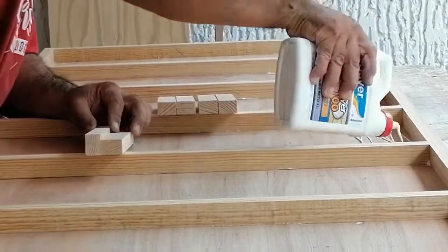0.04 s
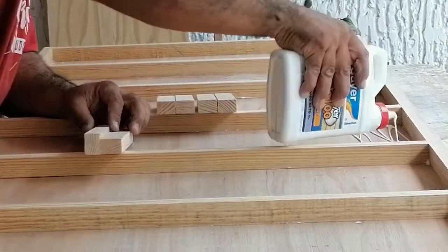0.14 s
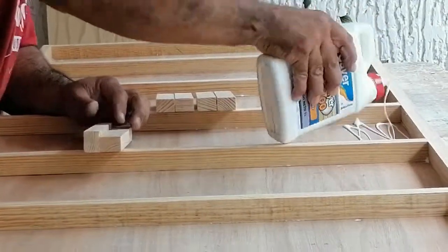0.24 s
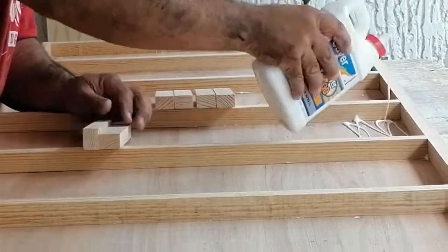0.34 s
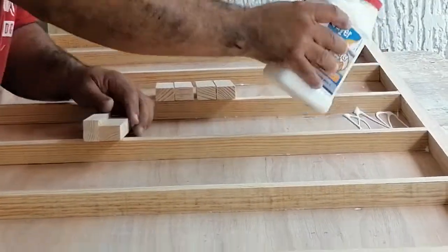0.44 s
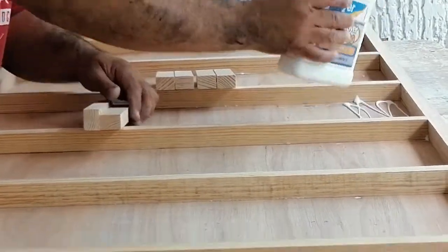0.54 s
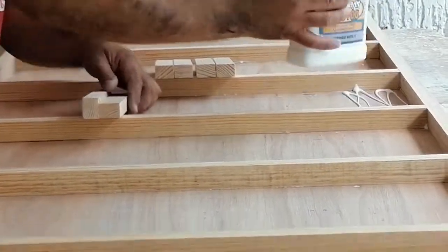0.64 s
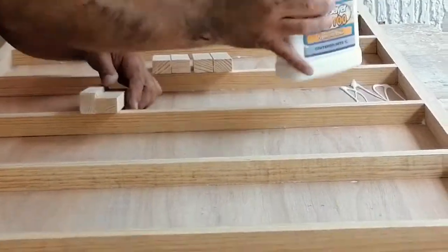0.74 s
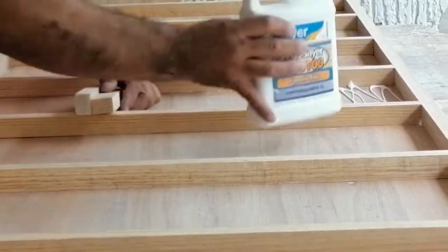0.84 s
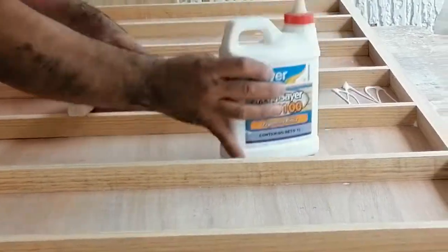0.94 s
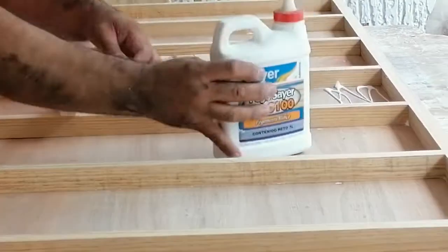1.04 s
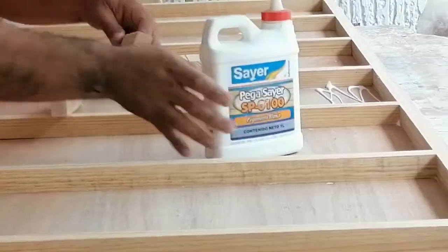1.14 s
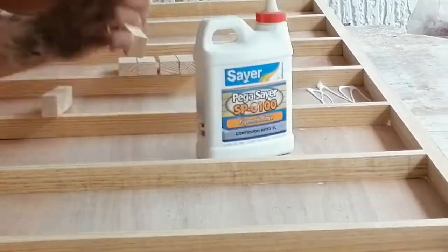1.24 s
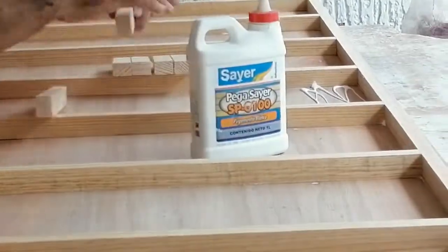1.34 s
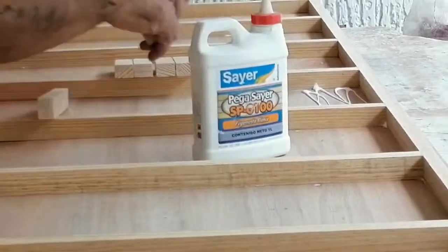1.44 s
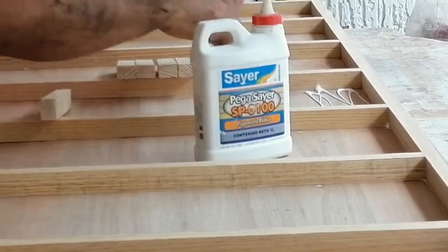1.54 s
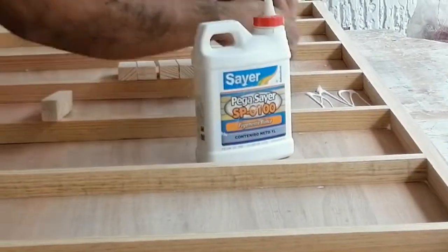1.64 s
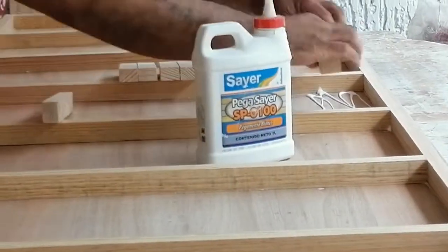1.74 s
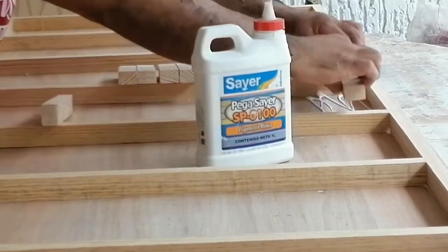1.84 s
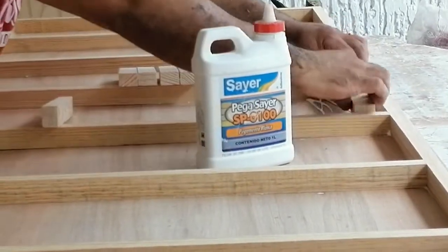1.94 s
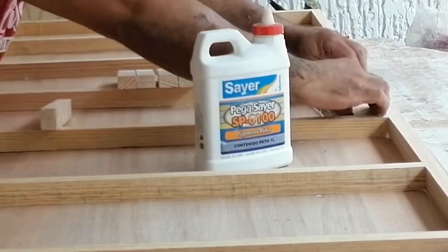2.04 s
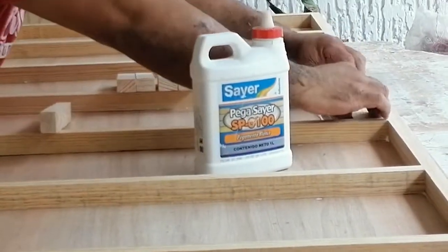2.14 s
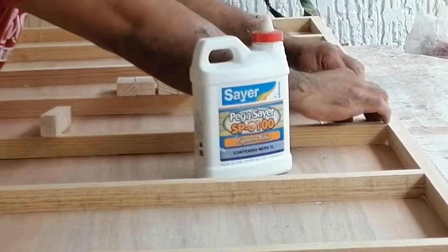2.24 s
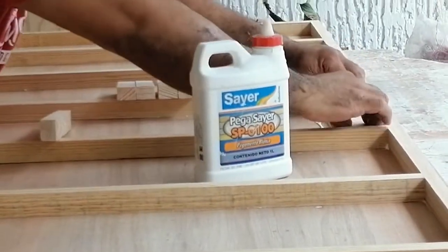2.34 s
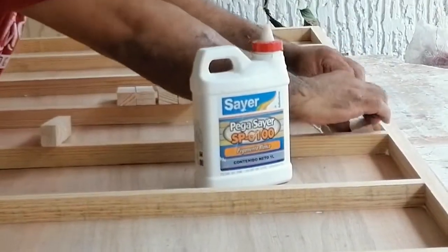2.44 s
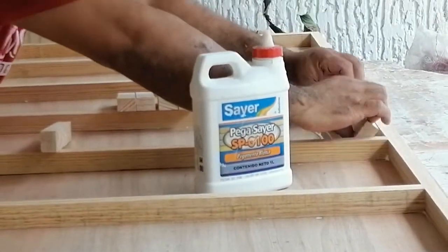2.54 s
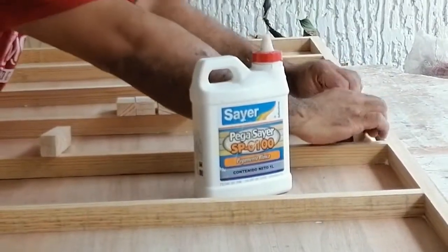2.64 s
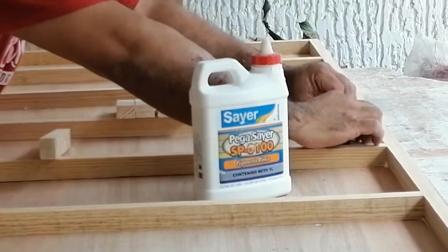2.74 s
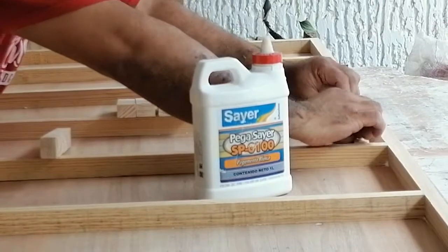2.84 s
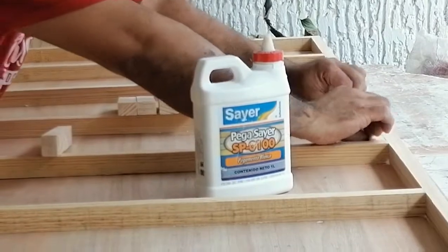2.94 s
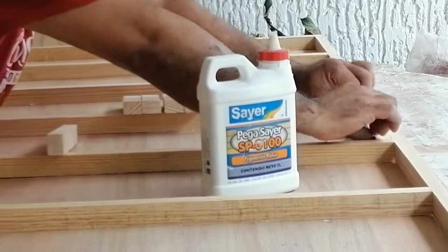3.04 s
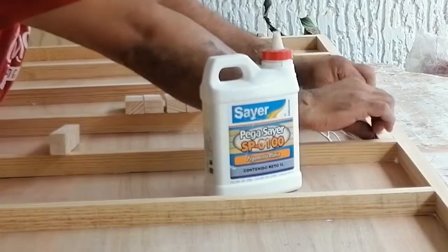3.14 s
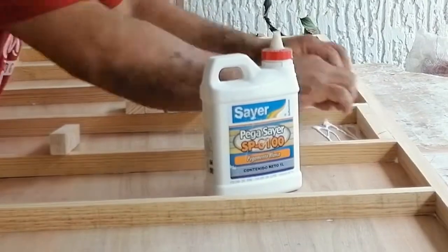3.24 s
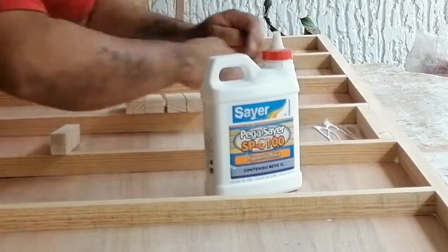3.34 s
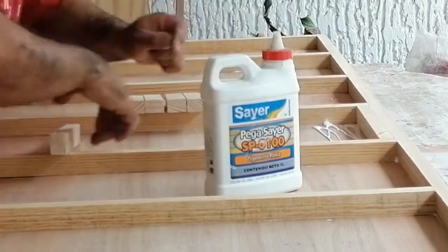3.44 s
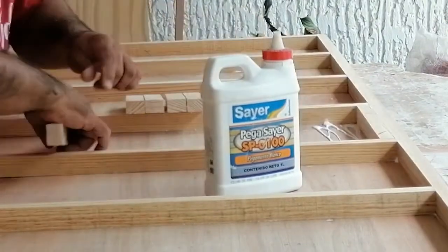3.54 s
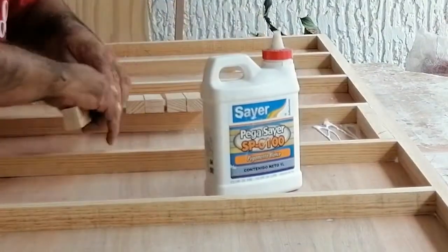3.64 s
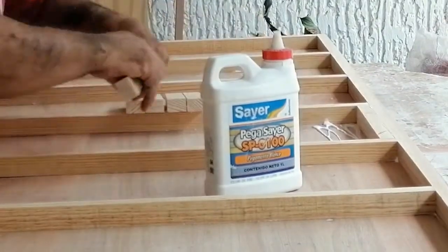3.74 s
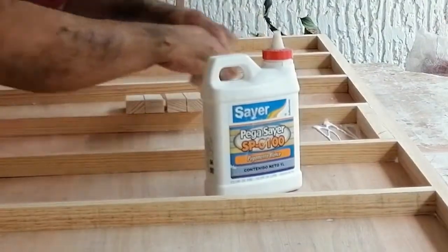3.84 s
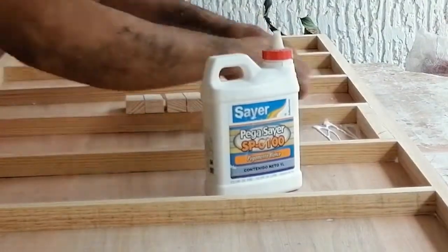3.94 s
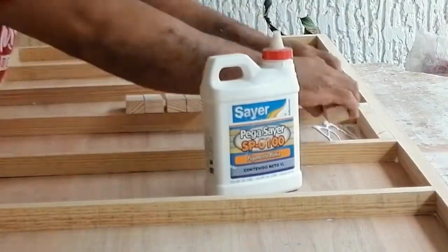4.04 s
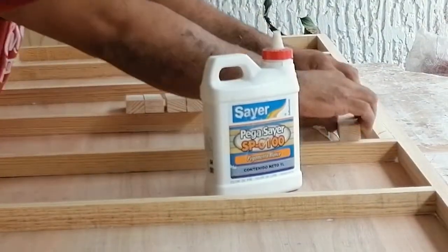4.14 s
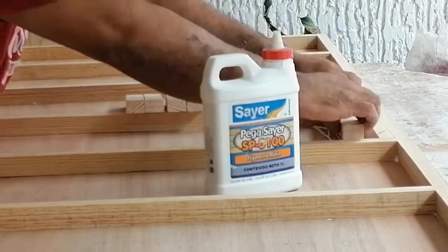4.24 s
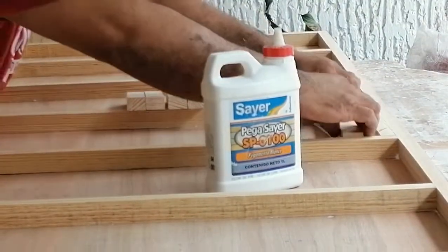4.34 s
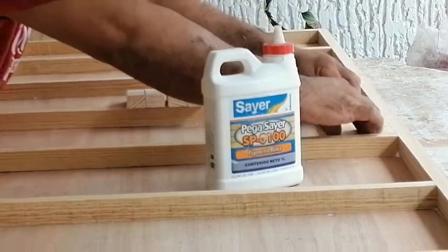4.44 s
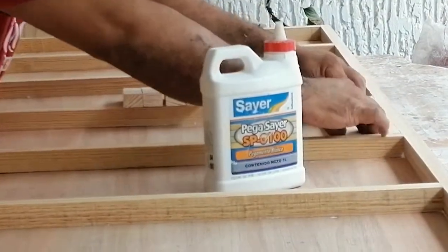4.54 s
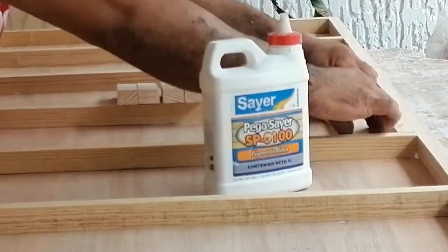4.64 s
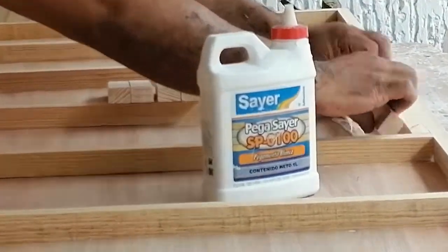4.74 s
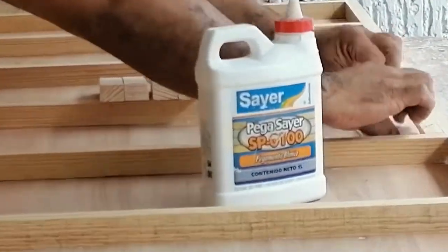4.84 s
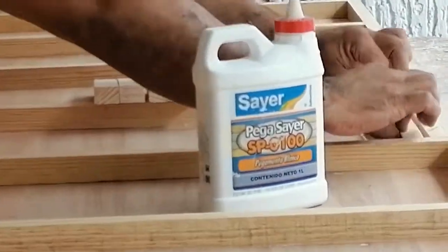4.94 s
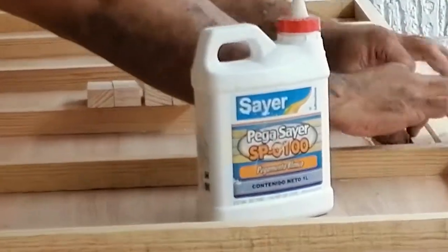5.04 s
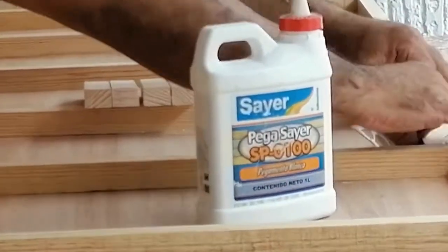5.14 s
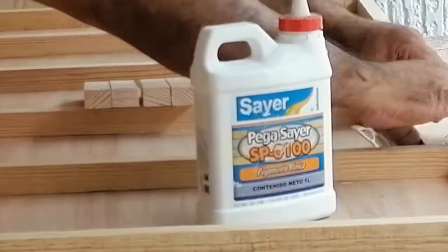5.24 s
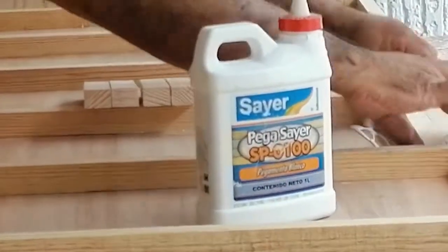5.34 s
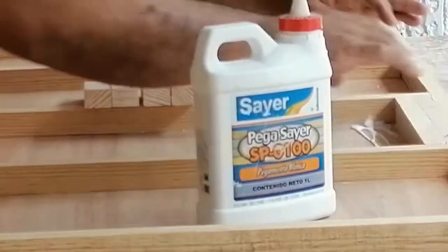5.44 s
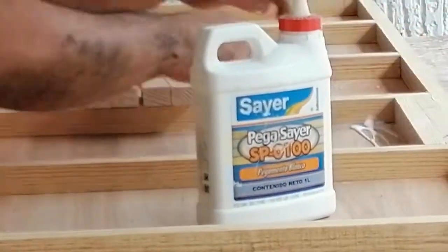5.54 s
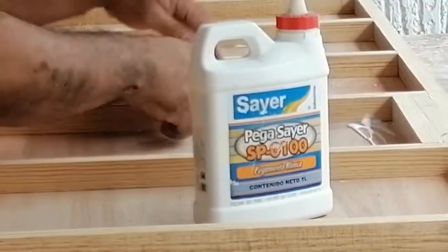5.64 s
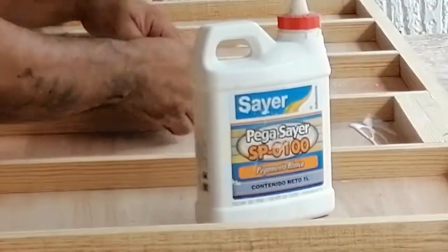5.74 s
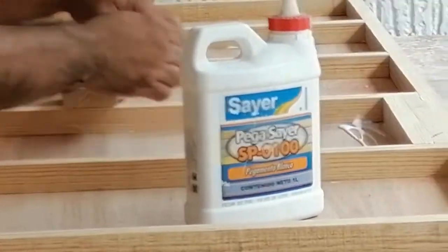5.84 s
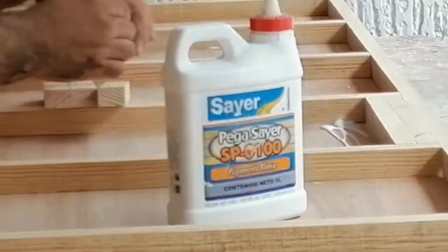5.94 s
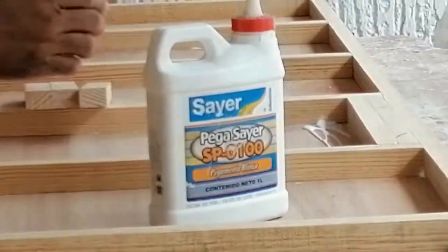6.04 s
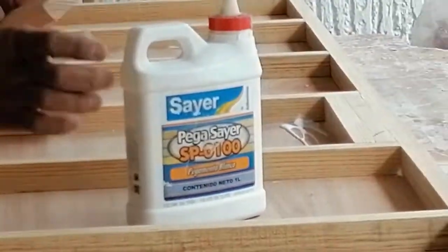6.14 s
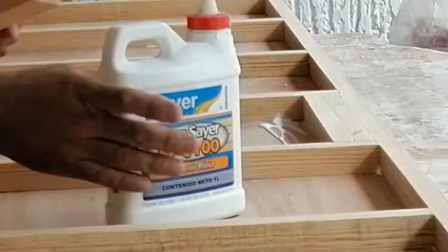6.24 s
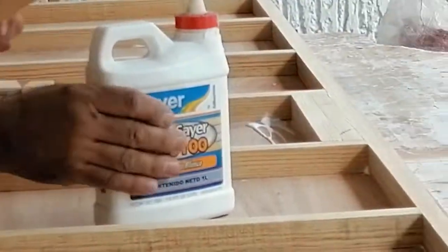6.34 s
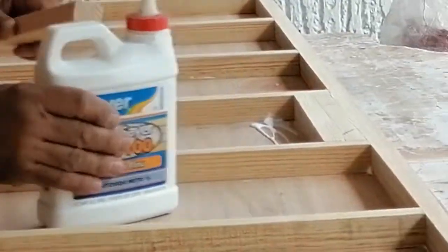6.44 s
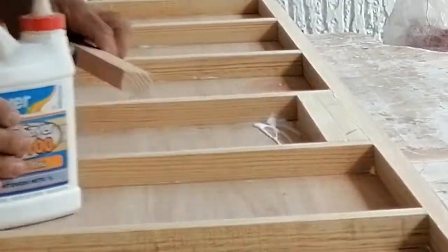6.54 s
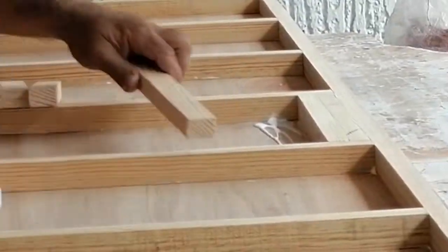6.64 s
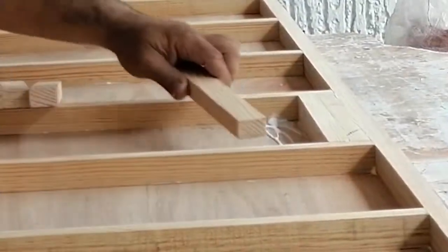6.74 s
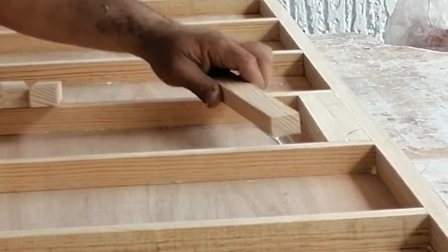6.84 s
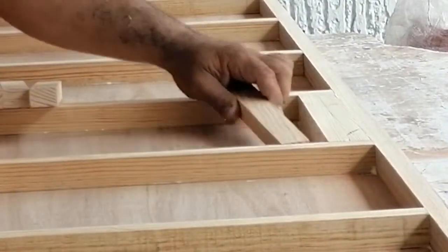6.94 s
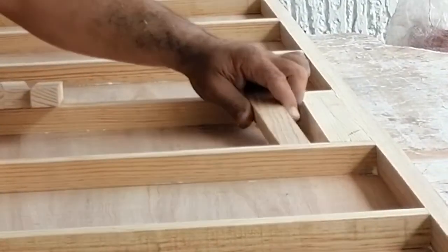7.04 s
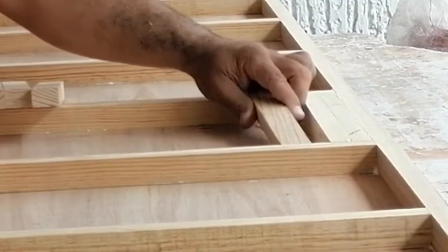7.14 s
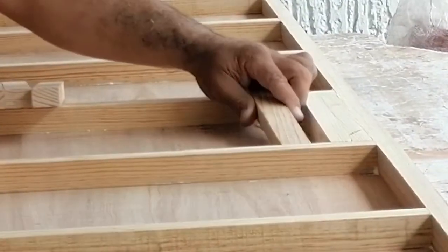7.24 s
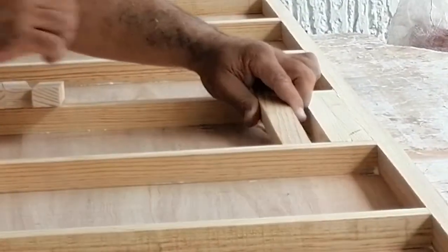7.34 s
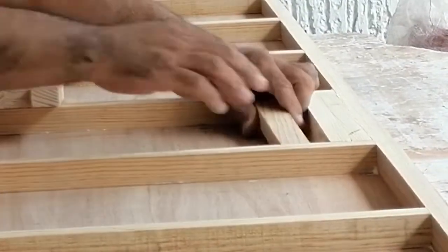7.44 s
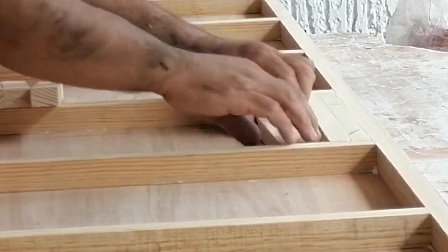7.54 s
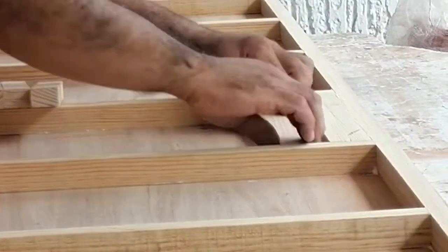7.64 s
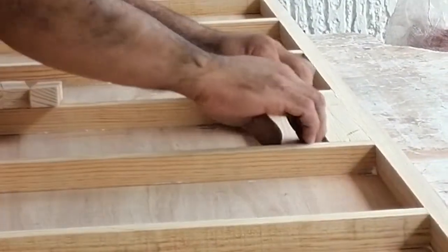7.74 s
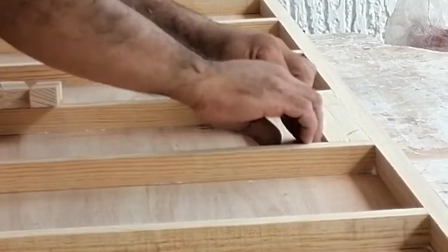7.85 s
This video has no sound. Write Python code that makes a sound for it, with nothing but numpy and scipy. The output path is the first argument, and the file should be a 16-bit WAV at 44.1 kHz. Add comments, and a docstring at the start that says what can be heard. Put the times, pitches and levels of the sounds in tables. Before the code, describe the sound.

Small wooden blocks and a plastic glue bottle knock and slide on a plywood frame in a slightly echoing workshop.

```python
"""Hard-walled workshop: wooden blocks and a plastic glue bottle are set down and shifted on a frame
of plywood and strips. Each touches with an edge and rings, then falls flat and drums the panel.
Sliding wood and bottle hiss and rasp; corners click, wood rings briefly, faint high whistles glide.
Two spaced microphones hear it all with the room's echo, over a low outdoor rumble and drone."""
import sys
import numpy as np
from scipy import signal
from scipy.fft import rfft, irfft, next_fast_len
from scipy.io import wavfile

SR = 44100
rng = np.random.default_rng(int(sys.argv[2]) if len(sys.argv) > 2 else 0)


def master_out(mix):
    """Clip the mix to full scale and print it as 16-bit PCM to the path in sys.argv[1]."""
    frames = np.transpose(np.atleast_2d(mix))
    ceiling = np.clip(frames, -1, 1)
    pcm = np.round(ceiling * 32767).astype(np.int16)
    wavfile.write(sys.argv[1], SR, pcm)


N = 347949

# Bottle bumped, or set down and rocking. Columns: start_s, force_db, contact_ms, thump_db, ring_hz,
# ring_db, tick_db, fall_ms, landing_over_edge_db, drum_hz
BOTTLE_KNOCKS = [(.333, 9.5, 0.87, 9, 696, 0, -16.5, 5.16, 1.5, 287),
                 (1.120, 8.5, 0.6, -0.5, 700, 11, 2, 6, -0.5, 1080),
                 (1.139, 0.5, 0.34, 15.5, 765, 7, -4, 25, -4, 182),
                 (1.197, 0, 2.35, 12.5, 198, 7, -25, 10.15, 1, 200)]
# Block set down, knocked into place or catching on a strip: same columns
BLOCK_KNOCKS = [(2.086, 8.5, 0.75, -9, 920, 8.7, -54, 20, -6, 1020),
                (2.190, -10, 0.7, 8.5, 590, 3, -38, 8.3, 4, 585),
                (2.779, 3.5, 0.61, 7.5, 1694, 18, -8.5, 11.5, 6.5, 630),
                (2.886, 0, .58, 12.5, 320, 5.4, -27, 13, -5, 298),
                (3.685, -13.5, 0.48, 15, 1300, 6, -8, 13, -1, 1400),
                (4.303, 4.5, 0.76, -9.5, 940, 3.7, -38, 4.37, 5.5, 384),
                (5.005, -4, .85, -11, 696, 6.1, -13, 11.7, -0.5, 700),
                (5.028, 16.5, 0.73, -8, 726, 4.8, -3.5, 5.3, 7, 167),
                (5.038, 9, 0.31, -10, 2660, 2.4, -2.5, 30, -8, 800),
                (5.308, 4, .49, -5.5, 1170, 2.1, -43, 16.8, -1.5, 736),
                (5.955, -3, 0.37, -4, 1580, 13, -15, 12, 8.5, 1520),
                (6.049, 5.5, 0.67, 3, 1520, 11, -29, 32, -11, 1520),
                (6.110, 21, 0.77, 0.5, 663, 9.4, -18, 20.3, -8.5, 322),
                (6.728, -6, 0.24, -7, 1750, 19, -8, 20, -5, 1750),
                (6.882, -6.5, .53, -15, 1380, 11, -14, 22, -5, 880),
                (7.187, 6, 0.88, 3.5, 990, 7.2, -26, 14, 2.5, 1040),
                (7.708, -15, 0.58, 17.5, 140, 4, -8, 10.3, 0.5, 140)]
# Resonances and hollows of each body: centre_hz, width_hz, gain_db
BOTTLE_RESONANCES = [(423, 530, -4), (645, 48, 6.5), (1060, 68, -2), (1390, 700, -4.5), (1700, 94, 10),
                     (2220, 130, 5.5), (3240, 94, -4), (4170, 1700, -3), (5300, 730, 6.5), (7040, 600, 5)]
BLOCK_RESONANCES = [(476, 85, 1), (907, 21, 2.5), (1040, 8, 2.5), (1510, 32, 6), (1670, 190, -6),
                    (2048, 41, 5.5), (2340, 47, 7), (3080, 90, 2.5), (3620, 47, 1.5), (4400, 49, 11.5),
                    (5400, 185, -1), (5900, 1200, -8.5), (7200, 110, 5.5)]
# Click of a hard edge: freq_hz, level_db
TICK_SPECTRUM = [(100, -8), (1500, -15), (3300, -6.5), (4100, -11), (5300, -9.5), (6200, -9.5),
                 (7200, -9.5), (8200, -20), (10000, -33.5), (15000, -53)]
# Plywood panel with its strips: freq_hz, level_db, t60_s
PANEL_MODES = [(146.5, 4, 0.55), (179.2, -15.5, 0.96), (235.7, 1, 0.52), (265.4, 2.5, 0.6), (302, -3, 0.46),
               (354.7, 7, 0.1), (395, -0.5, 0.3), (576, -19, 0.36), (650, -8, 0.16), (690, 6.5, 0.16),
               (743, 0.5, 0.43), (784, -18, 1.0), (890.5, 5, 0.15), (1010, -22, 0.24), (1104, 2.5, 0.28),
               (1526, -19, 0.98), (2010, -7, 0.9), (2310, -16, .28), (3480, -2, 0.53), (7400, 2, .42)]
# Hands, blocks and bottle rubbing the wood: start_s, rise_s, hold_s, hiss_db, rasp_db
STROKES = [(0.514, 0.014, .008, -53.5, -64.5), (0.599, 0.018, 0.23, -70, -71.5),
           (1.378, 0.18, 0.27, -70.5, -72), (2.578, 0.013, 0.094, -65.5, -61.5),
           (3.079, 0.088, 0.045, -63.5, -65), (3.204, 0.027, 0.016, -48, -56.5),
           (3.681, 0.0044, .012, -54, -70), (3.737, .01, 0.28, -70.5, -84), (4.9, .02, .02, -71, -67.5),
           (5.953, 0.017, 0.024, -54, -46), (6.56, 0.13, 0.12, -37.5, -44), (6.723, 0.031, 0.14, -46, -44),
           (7.665, .025, .005, -67.5, -70)]
# Fine and coarse friction noise: freq_hz, density_db
HISS_SPECTRUM = [(2180, -25), (3700, -21), (4300, -16.5), (4990, -7.5), (5940, -4), (6940, -8), (7330, -5),
                 (8770, -17), (10000, -18), (10800, -23), (13300, -27.5), (14600, -26), (15500, -32)]
RASP_SPECTRUM = [(290, -2), (500, -27), (880, -3.5), (1000, -11.5), (1510, 3.5), (1770, -2), (2230, -2.5),
                 (3220, -1.5), (4000, -8), (5200, -6), (8800, -120)]
# Plywood under friction: centre_hz, width_hz, gain_db
FRICTION_RESONANCES = [(710, 63, 7.5), (865, 29, 9), (1114, 38, 12), (1580, 60, -7), (1738, 13, 9.5),
                       (2930, 250, 2), (3264, 29, 7), (6520, 70, 7.5), (6960, 370, 9)]
# Clicks of a nail or sharp corner: start_s, level_db
SNAPS = [(.512, -16.5), (3.685, -27), (5.028, -18)]
# Brief ringing tones of the wood: start_s, length_s, pitch_hz, level_db
WOOD_RINGS = [(2.761, 0.2, 4430, -71), (2.772, 0.09, 3610, -66), (4.999, 0.028, 7160, -57),
              (6.012, .02, 4500, -59), (6.047, 0.036, 1554, -45), (6.723, 0.065, 1760, -48),
              (6.875, .035, 1310, -50)]
# Thin whistles: start_s, length_s, start_hz, middle_hz, end_hz, level_db
WHISTLES = [(0.988, .07, 9450, 9750, 10050, -77), (1.456, 0.1, 9100, 9450, 8950, -66.5),
            (1.857, .12, 10850, 9900, 9350, -77)]
# Workshop decay: freq_hz, t60_s
ROOM_DECAY = [(100, 0.91), (260, 0.48), (700, 0.52), (1800, 0.51), (5000, .52), (8000, 0.47), (15000, 0.65)]
# Steady air: freq_hz, density_db
AIR_SPECTRUM = [(12, -36), (20, -5), (42, 0), (64, -5.5), (140, -7.5), (289, -13.5), (427, -20.5),
                (597, -17.5), (811, -21), (932, -18), (1580, -30.5), (4070, -39), (7110, -41), (8880, -52),
                (15500, -53)]
# Microphone treble peaks and hollow: centre_hz, width_hz, gain_db
MIC_RESONANCES = [(3350, 500, 4), (3970, 1950, -3.5), (7000, 530, 4.5)]
# Swells of the outdoor rumble: peak_s, length_s, level_db
RUMBLE_SWELLS = [(0.142, 0.17, -49), (.85, .25, -50), (1.72, 0.33, -42.5), (2.262, 0.26, -35),
                 (2.645, 0.16, -52), (4.073, .25, -46), (5.466, .35, -42.5), (6.957, 0.11, -41.5),
                 (7.389, 0.45, -48)]
# Outdoor drone: time_s, level_db
DRONE_LEVELS = [(0.0, -54), (0.11, -61), (2.22, -65), (5.78, -46), (6.59, -45.5), (6.68, -56.5),
                (6.97, -39), (7.01, -45.5), (7.82, -55.5), (7.89, -67)]

TAPS, SOUND_M_PER_S = 4096, 343


def knocks(direct_db=-11):
    """Edge contact, then flat landing; each heard direct, through panel and strips, and off the room."""
    out, t = np.zeros((2, N)), np.arange(6 * TAPS) / SR
    near = panel(t) + amp(direct_db) * signal.unit_impulse(len(t))
    bottle = BOTTLE_KNOCKS, BOTTLE_RESONANCES, 8, 1, -3
    blocks = BLOCK_KNOCKS, BLOCK_RESONANCES, 6, 0.5, -0.9
    for rows, resonances, drum_db, edge_pan_db, flat_pan_db in bottle, blocks:
        for (start_s, force_db, contact_ms, thump_db, ring_hz,
             ring_db, tick_db, fall_ms, landing_db, drum_hz) in rows:
            edge = blow(resonances, contact_ms, thump_db, ring_hz, ring_db, tick_db)
            edge = amp(force_db) * pan(edge_pan_db) * edge
            # flat face: longer contact, more thump, damped ring, less tick
            flat = blow(resonances, 1.25 * contact_ms, thump_db + 6, ring_hz, 0.1 * ring_db,
                        tick_db - 9.5, drum_hz, drum_db)
            flat = amp(force_db + landing_db) * pan(flat_pan_db) * flat
            for at_s, click in (start_s, edge), (start_s + fall_ms / 1000, flat):
                paths = near + strips(t) + workshop(t)
                add(out, at_s, signal.fftconvolve(paths, click, axes=1))
    return out


def blow(resonances, contact_ms, thump_db, ring_hz, ring_db, tick_db, drum_hz=300, drum_db=0):
    """One impact: short contact is bright, long is dull; an edge ticks, a face drums the panel."""
    hz = np.fft.rfftfreq(TAPS, 1 / SR)
    push = 1 / np.sqrt(1 + (hz * contact_ms / 1000) ** 9)
    bass_db = thump_db / (1 + (hz / 330) ** 4)
    body = amp(bass_db + ring_db * bell(hz, ring_hz, 0.21) + drum_db * bell(hz, drum_hz, 0.36))
    tick = amp(tick_db + lookup(TICK_SPECTRUM, hz))
    radiated = highpass(hz, corner_hz=135, order=5)  # little air moves below the panel's first mode
    return minimum_phase(radiated * amp(colour_db(resonances, hz)) * np.hypot(push * body, tick))


def panel(t, gain_db=-57.5, build_s=0.0007):
    """Bending modes, alternating in sign, build as the blow spreads over the plywood."""
    modes = sum((-1) ** k * amp(level_db) * decay(t, t60_s) * np.sin(2 * np.pi * hz * t)
                for k, (hz, level_db, t60_s) in enumerate(PANEL_MODES))
    return amp(gain_db) * modes * (1 - np.exp(-t / build_s))


def strips(t, gain_db=-7, t60_s=0.11):
    """The stiff strips ring in many short-lived modes."""
    ring = unit_rms(diffuse(TAPS) * decay(t[:TAPS], t60_s)) / np.sqrt(TAPS)
    return amp(gain_db) * np.pad(ring, ((0, 0), (0, len(t) - TAPS)))


def slides(fade_db_per_s=126, flutter_db=0.26, catches_per_s=260):
    """Friction on grain: hiss and rasp rise with speed, hold and fade, fluttering as fibres catch."""
    out, t = np.zeros((2, N)), np.arange(SR) / SR
    for start_s, rise_s, hold_s, hiss_db, rasp_db in STROKES:
        rise = np.minimum(t / rise_s, 1) ** 0.54
        fade = amp(-fade_db_per_s * np.maximum(t - rise_s - hold_s, 0))
        hiss = amp(hiss_db) * shaped_noise(len(t), HISS_SPECTRUM, FRICTION_RESONANCES)
        rasp = amp(rasp_db) * shaped_noise(len(t), RASP_SPECTRUM, FRICTION_RESONANCES)
        catches = np.interp(t * catches_per_s, np.arange(1024), rng.standard_normal(1024))
        add(out, start_s, rise * fade * (hiss + rasp) * amp(flutter_db * catches))
    return out * pan(left_db=1)


def snaps(centre_hz=7200, room_db=-9, crackle_s=0.001):
    """A nail or sharp corner clicks: a bright crackle, mostly direct sound."""
    out, t = np.zeros((2, N)), np.arange(SR // 2) / SR
    click = minimum_phase(bell(np.fft.rfftfreq(TAPS, 1 / SR), centre_hz, 0.24) ** 0.5)
    for start_s, level_db in SNAPS:
        crackle = unit_rms(diffuse(len(t)) * np.exp(-t / crackle_s)) / np.sqrt(len(t))
        paths = crackle + amp(room_db) * workshop(t)
        add(out, start_s, amp(level_db) * signal.fftconvolve(paths, click[None], axes=1))
    return out


def wood_rings():
    """Brief narrow ringing tones of the wood as blocks are knocked or slid."""
    out = np.zeros((2, N))
    for start_s, length_s, pitch_hz, level_db in WOOD_RINGS:
        n = int(length_s * SR)
        tone = diffuse(n, lambda hz: bell(hz, pitch_hz, 0.023))
        add(out, start_s, amp(level_db) * tone * signal.windows.tukey(n, 0.5))
    return out


def whistles(room_db=-3):
    """Faint, very high gliding tones with room echo."""
    out = np.zeros((2, N))
    for start_s, length_s, *pitches_hz, level_db in WHISTLES:
        progress = np.linspace(0, 1, int(length_s * SR))
        glide_hz = np.polyval(np.polyfit([0, 0.5, 1], pitches_hz, 2), progress)
        tone = np.sin(2 * np.pi * np.cumsum(glide_hz) / SR)
        add(out, start_s, amp(level_db) * np.sin(np.pi * progress) * tone[None])
    echo = signal.fftconvolve(out, workshop(np.arange(SR // 2) / SR), axes=1)[:, :N]
    return out + amp(room_db) * echo


def workshop(t, tail_db=-3.5, early_db=-10, build_s=0.012):
    """Room response: early reflections, then a tail with each band dying at its own rate."""
    noise = diffuse(len(t), lambda hz: highpass(hz, corner_hz=190, order=2))
    hz, time_s, bands = signal.stft(noise, SR, nperseg=256)
    bands = bands * decay(time_s, lookup(ROOM_DECAY, hz)[:, None])
    tail = signal.istft(bands, SR)[1][:, :len(t)]
    tail = unit_rms(tail * (1 - np.exp(-t / build_s)))
    early = unit_rms(reflections(len(t)))
    return (amp(tail_db) * tail + amp(early_db) * early) / np.sqrt(len(t))


def reflections(n, count=14, first_s=0.002, spread_s=0.045, fade_s=0.012, spacing_m=0.12):
    """Single echoes off strips, floor and wall, each from its own side."""
    jitter, side, polarity = rng.random((count, 3)).T
    delay_s = first_s + spread_s * ((np.arange(count) + jitter) / count) ** 1.5
    echoes = np.zeros((2, n))
    for channel, offset in enumerate((side - 0.5, 0.5 - side)):
        arrival_s = delay_s + offset * spacing_m / SOUND_M_PER_S
        echoes[channel, (arrival_s * SR).astype(int)] = np.sign(polarity - 0.5) * np.exp(-delay_s / fade_s)
    return echoes


def background(air_db=-49.5, rumble_floor_db=-57.5, rumble_trim_db=-4):
    """Steady air and microphone hiss; outside, a swelling rumble and a drone that grows and fades."""
    t = np.arange(N) / SR
    air = amp(air_db) * shaped_noise(N, AIR_SPECTRUM, MIC_RESONANCES, spacing_m=0.21)
    swells = sum(amp(level_db) * np.exp(-(2 * (t - peak_s) / length_s) ** 2)
                 for peak_s, length_s, level_db in RUMBLE_SWELLS)
    rumble_gain = amp(rumble_trim_db) * (amp(rumble_floor_db) + swells)
    rumble = diffuse(N, lambda hz: bell(hz, 43.7, 0.99) ** 2)
    drone_gain = amp(np.interp(t, *np.transpose(DRONE_LEVELS)))
    drone = diffuse(N, lambda hz: bell(hz, 82.6, 0.1) + 0.36 * bell(hz, 134.7, 0.12))
    return (air + rumble_gain * rumble + drone_gain * drone) * pan(left_db=2)


def diffuse(n, colour=np.ones_like, spacing_m=0.17):
    """Noise from all sides: alike at both microphones in the bass, unrelated in the treble."""
    size = next_fast_len(n)
    hz = np.fft.rfftfreq(size, 1 / SR)
    left, unrelated = rfft(rng.standard_normal((2, size)))
    coherence = 0.94 * np.sinc(2 * hz * spacing_m / SOUND_M_PER_S)
    right = coherence * left + np.sqrt(1 - coherence ** 2) * unrelated
    return unit_rms(irfft(np.array([left, right]) * colour(hz), size)[:, :n])


def shaped_noise(n, spectrum, resonances, spacing_m=0.17):
    """Diffuse noise with a broad spectrum plus resonances."""
    return diffuse(n, lambda hz: amp(lookup(spectrum, hz) + colour_db(resonances, hz)), spacing_m)


def minimum_phase(gain):
    """Impulse response of a gain curve; all ringing follows the blow."""
    log_gain = np.log(np.maximum(np.r_[gain, gain[-2:0:-1]], 1e-5))
    return np.fft.ifft(np.exp(np.conj(signal.hilbert(log_gain)))).real[:TAPS // 2]


def colour_db(resonances, hz):
    """Summed peaks and hollows of a body."""
    return sum(db * bell(hz, centre_hz, width_hz / centre_hz) for centre_hz, width_hz, db in resonances)


def bell(hz, centre_hz, relative_width):
    """Power response of one resonance."""
    return 1 / (1 + (2 * (hz - centre_hz) / (relative_width * centre_hz)) ** 2)


def highpass(hz, corner_hz, order):
    return 1 / np.sqrt(1 + (corner_hz / (hz + 1)) ** (2 * order))


def lookup(table, hz):
    """Interpolates over log frequency."""
    freq_hz, values = np.transpose(table)
    return np.interp(np.log(hz + 1), np.log(freq_hz + 1), values)


def decay(t, t60_s):
    return amp(-60 * t / t60_s)


def amp(db):
    return 10 ** (np.asarray(db) / 20)


def pan(left_db):
    """Stereo gains, left_db louder on the left than on the right."""
    return amp([[left_db / 2], [-left_db / 2]])


def unit_rms(x):
    return x / np.sqrt(np.mean(x ** 2) + 1e-20)


def add(mix, start_s, sound):
    part = mix[:, round(start_s * SR):][:, :sound.shape[1]]
    part += sound[:, :part.shape[1]]


def scene():
    """Work on the frame over the background."""
    return knocks() + slides() + snaps() + wood_rings() + whistles() + background()


def record(dry):
    """Sound reaches the left microphone 3 samples late; low-pass at 15.7 kHz."""
    left = np.r_[np.zeros(3), dry[0, :-3]]
    lowpass = signal.firwin(511, 15700, window=("kaiser", 9), fs=SR)
    return signal.oaconvolve(np.array([left, dry[1]]), lowpass[None], "same")


dry = scene()
out = record(dry)
master_out(out)
```